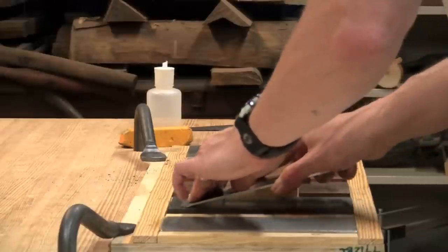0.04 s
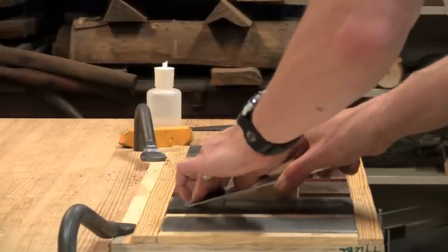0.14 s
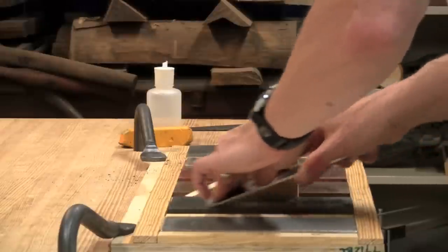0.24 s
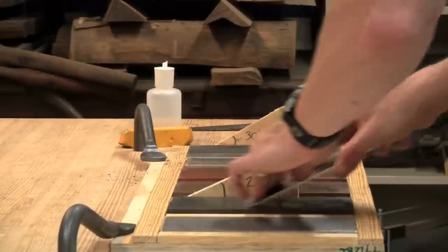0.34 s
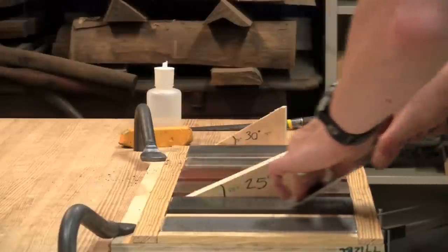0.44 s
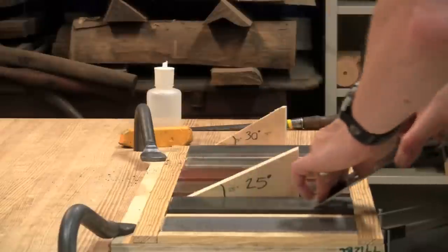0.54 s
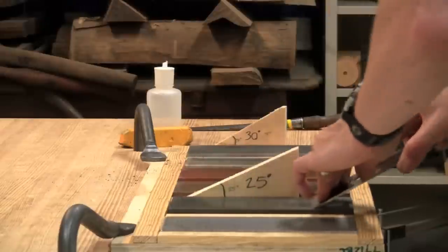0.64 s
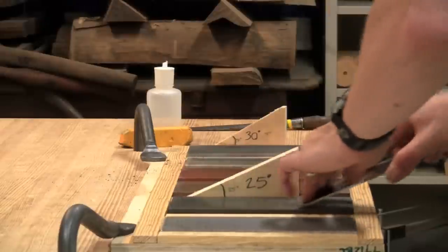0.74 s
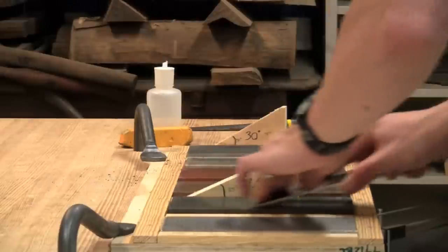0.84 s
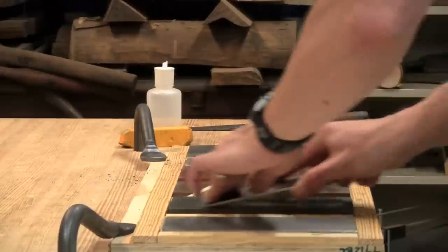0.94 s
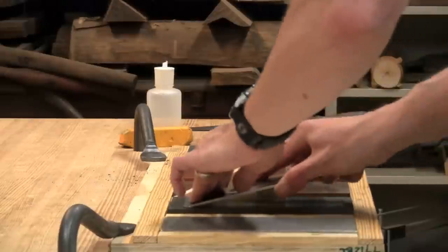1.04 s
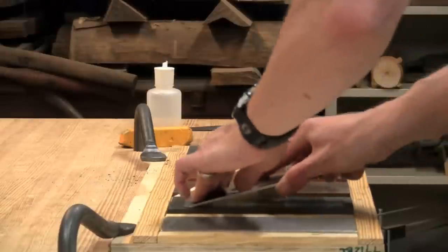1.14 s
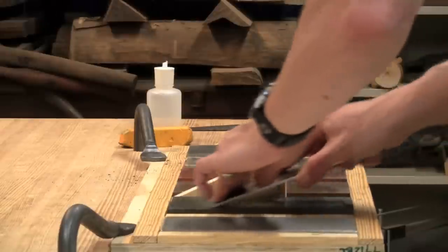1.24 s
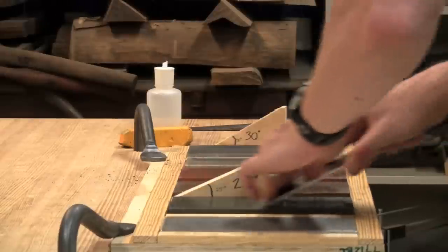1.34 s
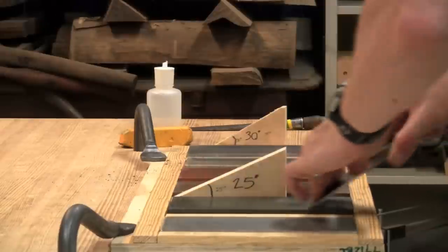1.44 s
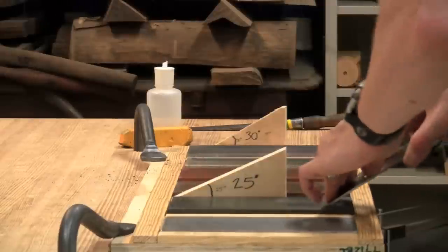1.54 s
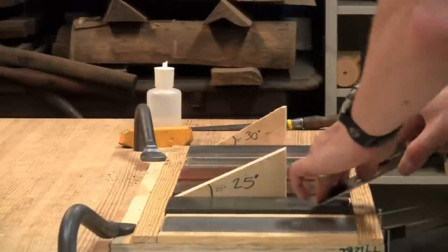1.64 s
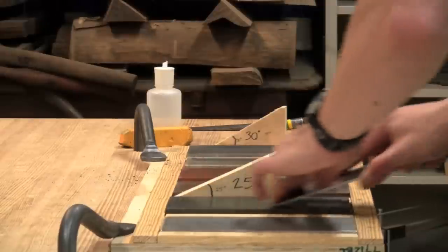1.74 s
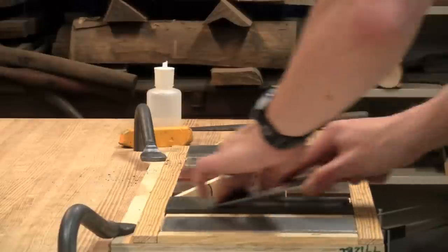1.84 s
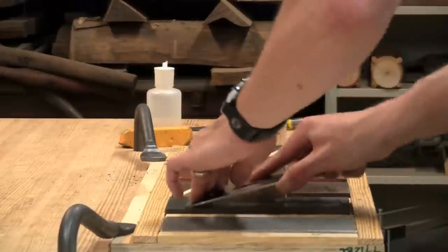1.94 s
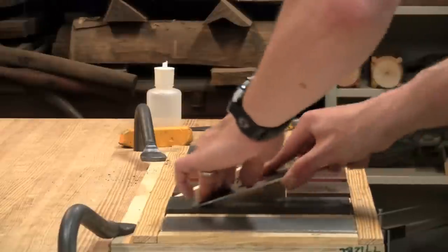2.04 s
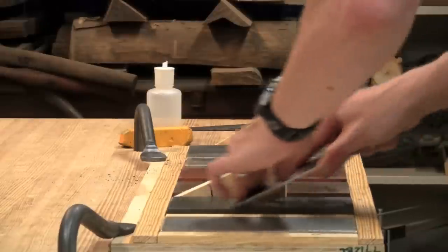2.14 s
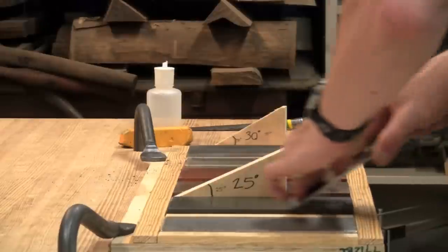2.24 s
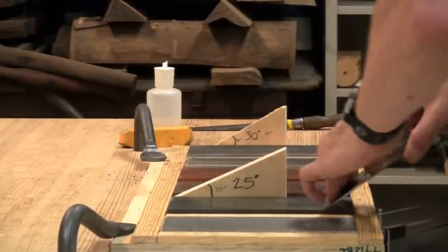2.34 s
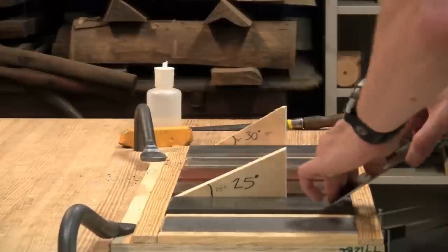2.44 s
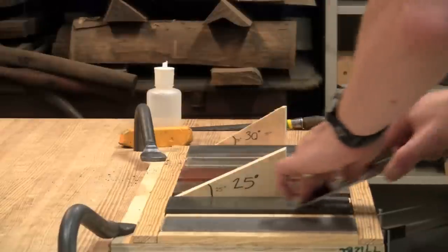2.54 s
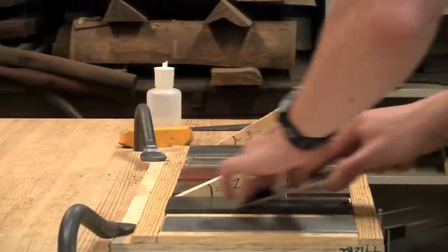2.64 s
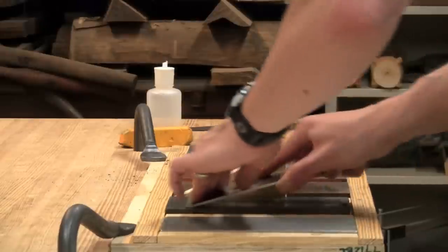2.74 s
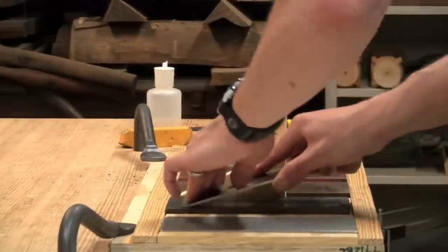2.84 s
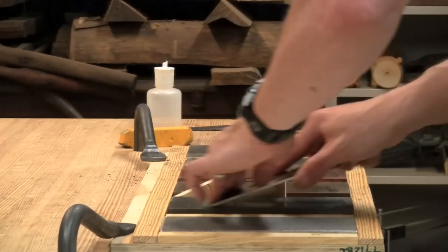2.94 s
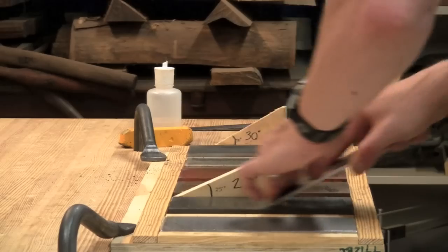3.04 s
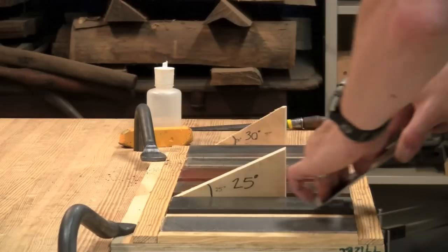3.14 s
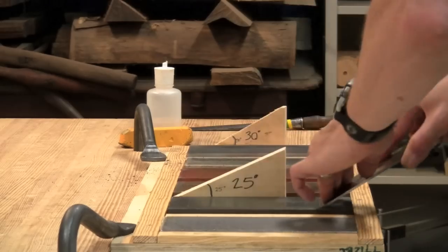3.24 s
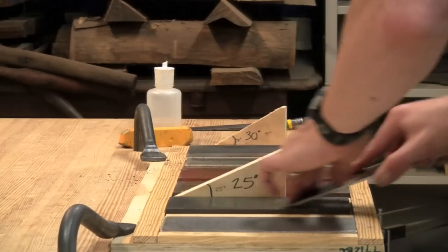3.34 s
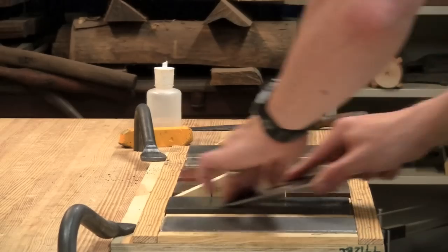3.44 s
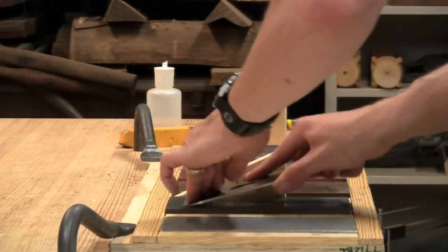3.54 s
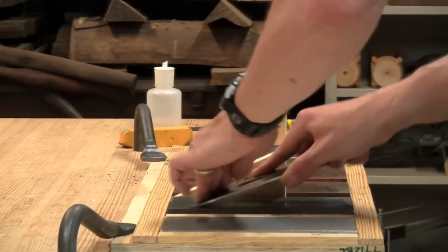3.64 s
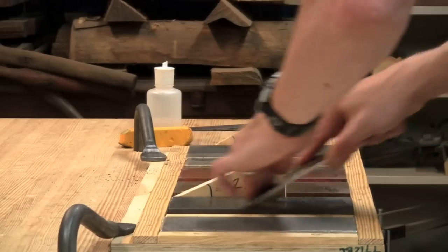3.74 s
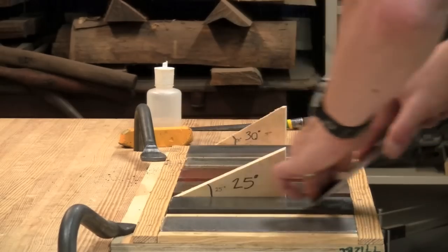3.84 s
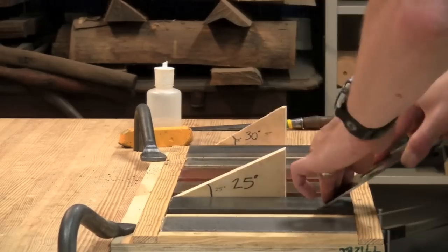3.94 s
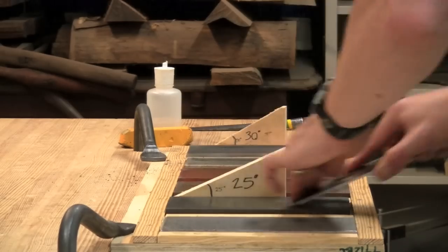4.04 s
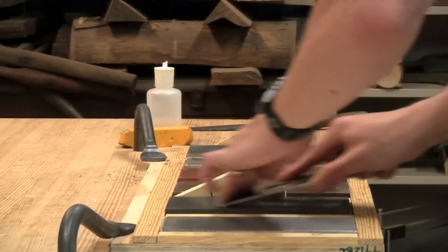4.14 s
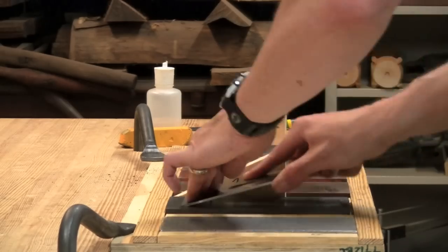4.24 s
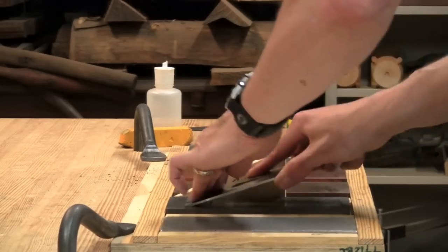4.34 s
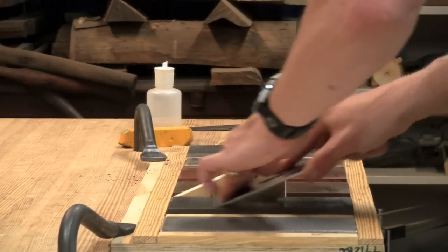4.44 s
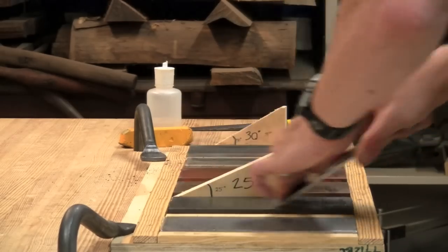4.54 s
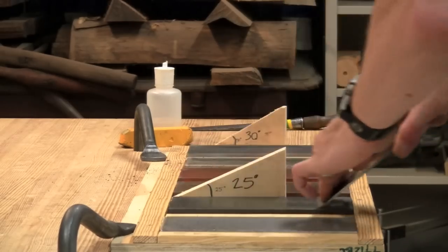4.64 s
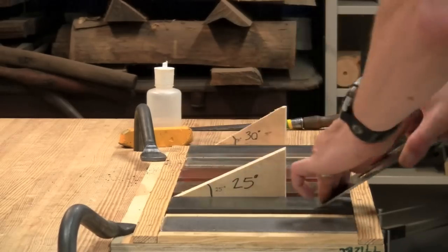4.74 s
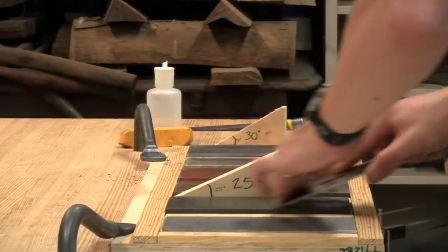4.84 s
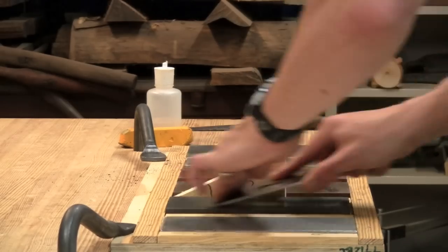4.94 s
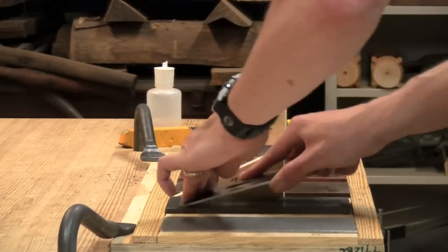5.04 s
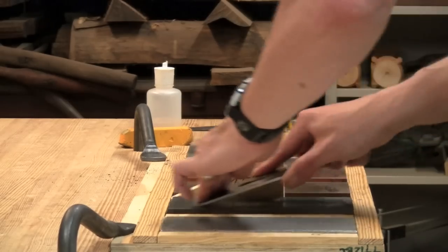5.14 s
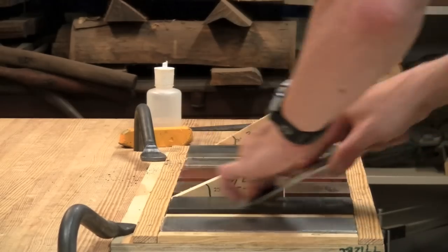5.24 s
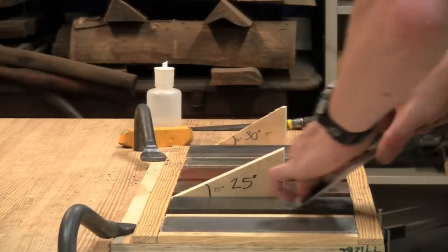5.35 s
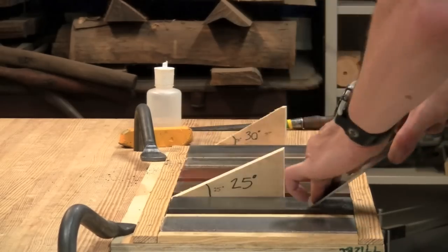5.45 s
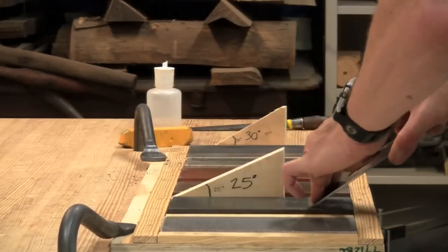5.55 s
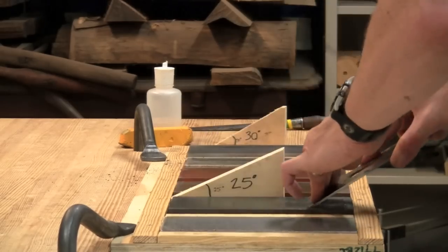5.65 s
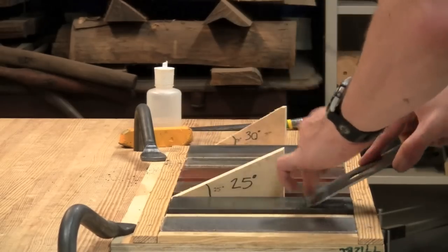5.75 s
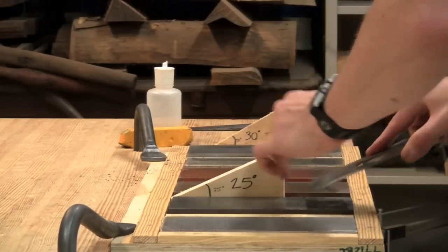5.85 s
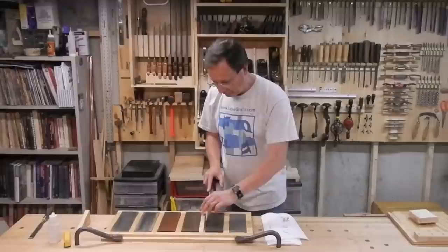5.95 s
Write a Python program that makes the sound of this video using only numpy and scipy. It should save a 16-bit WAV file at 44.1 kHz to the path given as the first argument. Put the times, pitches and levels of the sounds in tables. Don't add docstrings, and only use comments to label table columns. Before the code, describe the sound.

Fast gritty scraping of metal on stone, push and pull alternating, punctuated by woody knocks and small ticks in a quiet workshop.

```python
import sys
import numpy as np
from scipy import signal
from scipy.fft import rfft, irfft, next_fast_len
from scipy.io import wavfile
from scipy.ndimage import uniform_filter1d, map_coordinates

SR = 44100
rng = np.random.default_rng(int(sys.argv[2]) if len(sys.argv) > 2 else 0)


def store_wav(level_fs):
    pcm = np.round(np.clip(np.atleast_2d(level_fs), -1, 1) * 32767)
    wavfile.write(sys.argv[1], SR, pcm.T.astype(np.int16))


def boost_factor(decibels):
    exponent = np.asarray(decibels, float) / 20
    return 10 ** exponent


N = 263936

# f/Hz, density/dB per Hz
AIR_SPECTRUM = [(12, -42), (20, -18.5), (421, 9.5), (1270, -6), (1830, -6), (2770, -12), (3650, -10.5),
                (4310, -17), (9900, -17.5), (13400, -41.5), (15000, -25)]
# t/s, level/dB
MOTOR_LEVEL = [(0, -86), (1.4, -78), (1.6, -90), (6, -97)]
# f/Hz, likeness/1
AIR_LIKENESS = [(30, .3), (120, 0.44), (1000, 0.92), (4000, .6), (12000, .2)]
# f/Hz, t60/s
SHOP_DECAY = [(200, .35), (2000, 0.27), (10000, 0.13)]
# t/s, peak level/dB, wood level/dB
CATCHES = [(0.0977, -50, -17), (0.1077, -43.5, -22), (0.1845, -54, -11), (0.2269, -43, -23),
           (0.274, -28, -15), (0.7617, -42.5, -14), (1.2363, -28.5, -18), (2.9522, -30, -13),
           (3.9425, -26.5, -24.5), (4.4154, -24, -24), (5.1976, -21, -10.5)]
# t/s, peak level/dB, brightness/dB, chatter/s
WEDGE_KNOCKS = [
    (1.727, -17.5, 12, 0.016),
    (2.186, -15, 0, 0.015),
    (2.582, -19.5, 6, 0.017),
    (3.035, -14, -22, 0.015),
    (3.386, -18.5, -6, 0.015),
    (3.732, -13, -19, 0.016),
    (4.093, -17.5, -0.5, 0.016),
    (4.495, -13, -2, 0.016),
    (4.877, -14.5, 2, 0.015),
    (5.243, -16, -16.5, 0.014),
]
# f/Hz, level/dB, t60/s
FRAME_MODES = [(196.6, -24.5, 0.26), (373, -9, 0.24), (423.3, -3, 0.2), (538, -7.5, 0.069), (582, 3, 0.14),
               (647, 5, 0.093), (736.5, 4, 0.13), (802, -8.5, 0.16), (889, -1, 0.14), (934, 0, 0.084),
               (1000, -14, .07), (1180, -28, .06), (1370, -21.5, .05), (1560, -29, .05), (2260, -28, .04)]
# t/s, edge hiss level/dB, blade ring over hiss/dB, stone rumble over hiss/dB
STROKE_CURVES = [
    [(0.0, -79, 9, 1), (0.012, -90, 1, -1), (0.086, -96, -2, -2), (0.112, -74.5, 10, -11),
     (0.124, -87, 4, -1), (0.21, -87, 6, -2)],
    [(0.21, -82, 6, -9), (0.226, -62.5, 1, -10), (0.282, -45, 0.5, -10), (0.304, -49.5, -7, 0.5),
     (0.312, -46.5, -4, -7), (0.524, -37.5, -4, -11.5), (0.646, -43, -2.5, -3.5), (0.694, -57.5, -8, -12),
     (0.75, -77, 2, 9)],
    [(0.75, -82, 1, 9), (0.76, -60.5, -4, -1), (0.814, -48.5, -4.5, -4.5), (0.952, -34.5, 1.5, -6.5),
     (1.036, -30, -5, -5), (1.112, -39, -2.5, -3.5), (1.156, -52.5, -2, -4), (1.22, -75, -3, 6)],
    [(1.22, -77, 1, 6), (1.25, -45, -3, -12), (1.316, -36, -8, -5.5), (1.476, -32.5, -2.5, -12.5),
     (1.574, -32, -6.5, -8), (1.616, -40.5, -3, -7.5), (1.678, -60.5, -5, -9), (1.71, -68, 5, 11)],
    [(1.71, -72.5, 8, 3), (1.738, -46.5, -1, 12.5), (1.774, -40, -7.5, -6.5), (1.882, -34, 2, -5.5),
     (1.978, -29.5, -5, -4.5), (2.038, -41.5, -3, -4), (2.08, -59.5, -1, -7)],
    [(2.08, -55.5, -6, -7), (2.12, -46.5, -2, -7.5), (2.204, -36, -6, -5), (2.25, -31, -7.5, -9.5),
     (2.392, -28.5, -3, -9), (2.462, -39, -5.5, -5), (2.504, -53.5, -6, -9), (2.55, -68, 2, 5)],
    [(2.55, -74, 6, 1), (2.596, -42.5, -4, 3), (2.62, -40.5, -4, -7), (2.784, -32.5, -3.5, -6),
     (2.856, -33, -3, -6), (2.926, -57, -4, 2), (2.94, -60, -2, 2)],
    [(2.94, -59.5, -2, -12), (2.954, -42, -6, -10), (3.002, -41.5, -3, -7), (3.048, -33, -7, -8),
     (3.2, -28.5, -5, -12), (3.256, -28.5, -7, -6.5), (3.33, -53.5, -3, -7.5), (3.35, -49, -8, -5)],
    [(3.35, -54, -3, -13), (3.406, -38.5, -4.5, 5), (3.422, -38.5, -5.5, -8), (3.546, -28.5, -1, -8),
     (3.614, -31, -4, -2.5), (3.706, -51, -7, -12), (3.72, -53.5, 1, -4.5)],
    [(3.72, -67, -6.5, 12.5), (3.744, -36.5, -2.5, 0), (3.828, -31.5, -8.5, -11.5), (3.942, -24, -1, -9.5),
     (3.99, -29.5, -5.5, -8), (4.05, -51.5, -10, -11), (4.07, -46, -4, -2.5)],
    [(4.07, -51, -4, 3), (4.088, -54, -2, -8), (4.106, -38.5, -9, 8), (4.14, -35, -3, -6.5),
     (4.288, -27, -3.5, -9), (4.34, -37.5, 1, -4.5), (4.4, -55.5, -0.5, -3)],
    [(4.4, -55, -7, -6), (4.442, -37.5, -2.5, -14), (4.464, -39, -9.5, -13), (4.508, -36.5, -0.5, -3),
     (4.538, -32, -9.5, -8.5), (4.714, -25.5, -3, -10), (4.734, -27, -4, -6.5), (4.84, -54, -9, -10)],
    [(4.84, -55.5, -5.5, -8), (4.894, -37.5, -7, 3), (4.942, -35.5, -5.5, -10.5), (5.066, -28.5, -3, -4.5),
     (5.13, -36, -4, -6.5), (5.156, -44, 0, -1), (5.18, -59, -3, -3)],
    [(5.18, -50, -0.5, 0), (5.208, -43.5, -7.5, -14), (5.264, -34.5, -2, -6.5), (5.352, -32.5, -8, -12.5),
     (5.43, -33, -4, -8.5), (5.496, -35, -9, -7), (5.572, -59, -11, -11.5), (5.64, -88, 4, 14)],
    [(5.64, -89, 6.5, 17), (5.678, -71.5, -7, -5), (5.698, -81, 0, 9), (5.772, -74.5, 0, -5),
     (5.816, -63.5, -7, 1.5), (5.856, -86, 0, 1), (5.98, -98, -3.5, 0)],
]
# f/Hz, width/Hz, level/dB
PUSH_MODES = [(794, 25, -6.5), (1136, 84, -4.5), (1520, 39, -1.5), (2550, 100, -3.5), (3770, 240, 2),
              (5110, 98, 0.5), (5420, 37, 1.5), (7194, 130, 4), (8200, 110, -1.5), (9060, 100, -5.5),
              (9260, 150, -4.5), (9730, 170, -9.5), (10500, 46, -13.5), (11070, 61, -1)]
# f/Hz, width/Hz, level/dB
PULL_MODES = [(822, 35, -2.5), (1584, 96, -1.5), (2250, 140, -3.5), (2840, 170, -14), (3743, 91, 4.5),
              (4730, 220, 1), (5090, 120, -2.5), (6400, 56, -14), (7060, 33, 6.5), (7760, 81, -0.5),
              (8850, 98, 0.5), (9810, 200, -5.5), (10970, 300, -8), (11300, 84, -3)]
# f/Hz, density/dB per Hz
SCRAPE_SPECTRUM = [(59, -62), (100, -31), (518, -8.5), (774, 0), (976, -10.5), (1130, -3.5), (1550, -4),
                   (1840, -14.5), (2320, -0.5), (3850, -6.5), (4270, -9), (7090, -5), (10800, 0),
                   (14200, -16.5), (15500, -69)]
# f/Hz, likeness/1
SCRAPE_LIKENESS = [(100, 0.63), (1000, 0.99), (2500, 1), (4500, 1), (7000, 0.74), (10000, 0.49),
                   (14000, .3)]
# f/Hz, left minus right level/dB
PORT_LEAN = [(60, -3), (110, 0.5), (200, -2), (380, -4.5), (700, -2.5), (1290, -0.5), (2380, -0.5),
             (4400, -0.5), (8120, -1.5), (15000, -1)]


def unit(x):
    return x / np.sqrt(np.mean(x ** 2) + 1e-20)


def along(points, f_hz):
    f, v = np.transpose(points)
    return np.interp(np.log(f_hz + 1), np.log(f + 1), v)


def curves(rows):
    t_s, *columns = np.transpose(rows)
    return [np.interp(np.arange(N) / SR, t_s, column) for column in columns]


def wobble(rate_hz):
    knots = rng.standard_normal(int(N * rate_hz / SR) + 4)
    return map_coordinates(knots, [np.arange(N) * rate_hz / SR])


def filtered(x, response):
    m = next_fast_len(N + SR // 2)
    f_hz = np.fft.rfftfreq(m, 1 / SR)
    return irfft(rfft(x, m) * response(f_hz), m)[..., :N]


def ports(pair, likeness):
    def mid_side(f):
        angle = np.arccos(np.clip(along(likeness, f), -1, 1)) / 2
        return np.array([np.cos(angle), np.sin(angle)])

    mid, side = filtered(pair, mid_side)
    return np.array([mid + side, mid - side])


def motor():
    level_db = curves(MOTOR_LEVEL)[0] + 5.0 + 1.5 * wobble(7.6)
    f_hz = 122 + 1.3 * wobble(3.1)
    return boost_factor(level_db) * np.sin(2 * np.pi * np.cumsum(f_hz) / SR)


def hum():
    air = unit(filtered(rng.standard_normal((2, N)), lambda f: boost_factor(along(AIR_SPECTRUM, f))))
    level_db = -68.5 + 0.8 * wobble(2.5)
    return boost_factor(level_db) * ports(air, AIR_LIKENESS) + motor()


def shop(x):
    delay_samples = 250
    f_hz, t_s, z = signal.stft(rng.standard_normal((2, SR // 2)), SR, nperseg=256)
    decay = boost_factor(-60 * t_s / along(SHOP_DECAY, f_hz)[:, None])
    tail = signal.istft(z * decay, SR, nperseg=256)[1]
    tail = tail / np.linalg.norm(tail[0])
    delayed = np.pad(x, (delay_samples, 0))[None]
    return signal.fftconvolve(delayed, tail, axes=1)[:, :N]


def ticks():
    out = np.zeros(N + SR)
    t = np.arange(SR // 20) / SR
    for start_s, level_db, wood_db in CATCHES:
        crack = boost_factor(-60 * t / 0.012) * rng.standard_normal(len(t))
        crack = np.diff(crack, prepend=0)
        modes = sum(np.sin(2 * np.pi * f_hz * t) for f_hz in (2650, 2950, 3600))
        steel = boost_factor(-60 * t / 0.03) * modes
        wood = boost_factor(wood_db - 60 * t / 0.08) * np.sin(2 * np.pi * 800 * t)
        tick = 0.6 * crack + 0.42 * steel + wood
        out[round(start_s * SR):][:len(t)] += boost_factor(level_db - 13) * tick
    return out[:N]


def frame_ring(t, bright_db):
    ring = np.zeros(len(t))
    for f_hz, level_db, t60_s in FRAME_MODES:
        tilt_db = bright_db * np.log2(f_hz / 600) / 3
        mode_db = level_db + tilt_db + rng.normal(0, 2.5)
        ring += boost_factor(mode_db - 60 * t / t60_s) * np.sin(2 * np.pi * f_hz * t)
    return ring


def wedge():
    out = np.zeros(N + SR)
    t = np.arange(SR // 4) / SR
    for start_s, peak_db, bright_db, chatter_s in WEDGE_KNOCKS:
        wood = frame_ring(t, bright_db)
        when_s = np.sort(rng.random(5)) * chatter_s * 1.3
        index = (np.clip(when_s - when_s[0], 0, 0.045) * SR).astype(int)
        contacts = np.zeros(SR // 20)
        contacts[index] = [0.5, 0.8, -1, 0.9, -0.6]
        knock = signal.fftconvolve(wood, contacts)
        out[round(start_s * SR):][:len(knock)] += boost_factor(peak_db) * knock / abs(knock).max()
    return out[:N]


def grit(spread_db, flutter_db):
    sizes = boost_factor(spread_db * rng.exponential(size=N // 4 + 1).repeat(4)[:N])
    bursts = boost_factor(flutter_db * (wobble(40) + wobble(150) + wobble(400)))
    return unit(rng.standard_normal((2, N)) * sizes * bursts)


def blade(grains, modes, lift_db):
    def response(f):
        ring = np.zeros(len(f))
        for center_hz, width_hz, level_db in modes:
            damping = (f * width_hz) ** 2
            ring += boost_factor(2 * level_db) * damping / ((center_hz ** 2 - f * f) ** 2 + damping)
        return boost_factor(along(SCRAPE_SPECTRUM, f)) * np.sqrt(1 + boost_factor(2 * lift_db) * ring)

    return unit(filtered(grains, response))


def below(f, edge_hz):
    return 1 / (1 + (f / edge_hz) ** 8)


def scrape():
    hiss_db, ring_db, rumble_db = curves(np.concatenate(STROKE_CURVES))
    starts_s = [stroke[0][0] for stroke in STROKE_CURVES]
    turns = np.searchsorted(starts_s, np.arange(N) / SR)
    pushing = uniform_filter1d(turns % 2 == 0, size=600, output=float)

    grains = grit(spread_db=2.0, flutter_db=0.49)
    push = blade(grains, PUSH_MODES, lift_db=6)
    pull = blade(grains, PULL_MODES, lift_db=4.5)
    sound = pushing * push + (1 - pushing) * pull

    rumble = filtered(sound, lambda f: below(f, 1776))
    hiss = filtered(sound, lambda f: 1 - below(f, 5330))
    ring = sound - rumble - hiss
    ring_gain = boost_factor(ring_db + 0.8 * wobble(25))
    rumble_gain = boost_factor(rumble_db + 1.0 + 1.2 * wobble(25))
    mix = unit(hiss) + ring_gain * unit(ring) + rumble_gain * unit(rumble)
    return boost_factor(hiss_db) * ports(mix, SCRAPE_LIKENESS)


def scene():
    near = scrape() + wedge() + ticks()
    sides = np.array([[1], [-1]])
    near = filtered(near, lambda f: boost_factor(along(PORT_LEAN, f) / 2 * sides))
    return near + boost_factor(-15) * shop(near.mean(axis=0)) + hum()


def top_cut(x):
    return signal.sosfilt(signal.butter(12, 15630, fs=SR, output="sos"), x)


def record(dry):
    return top_cut(dry)


dry = scene()
out = record(dry)
store_wav(out)
```